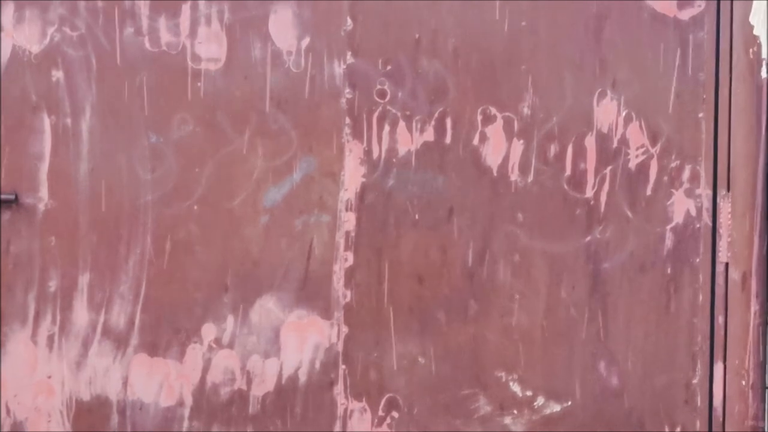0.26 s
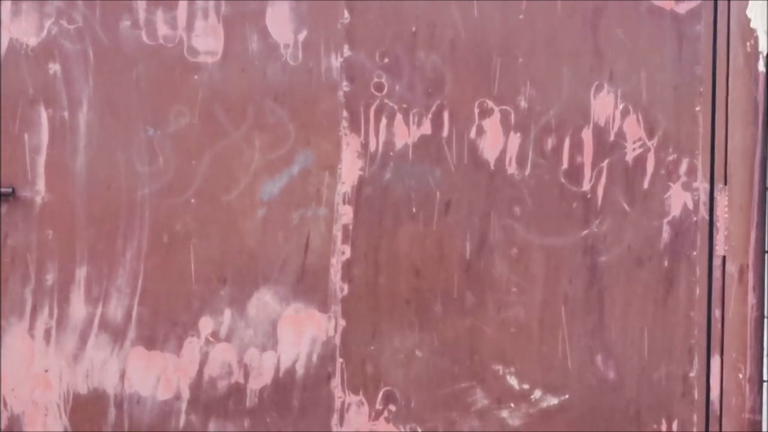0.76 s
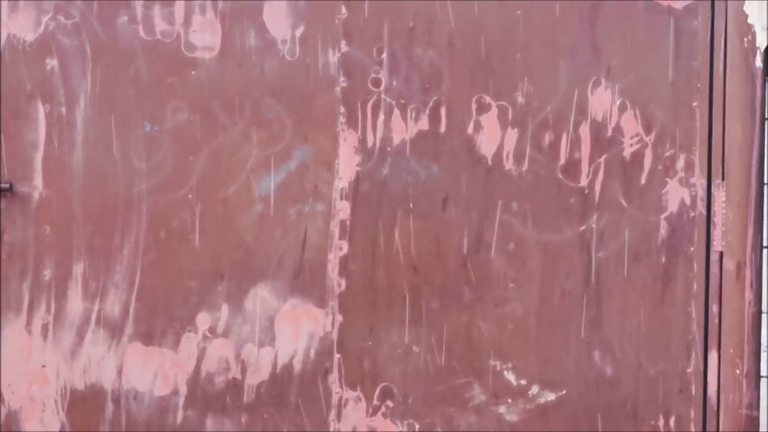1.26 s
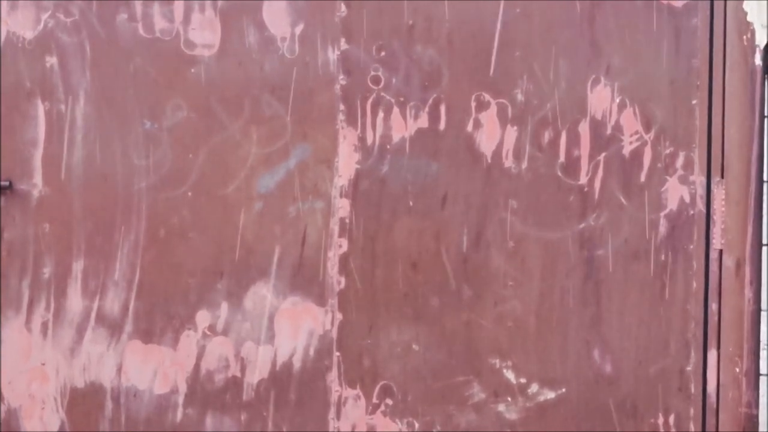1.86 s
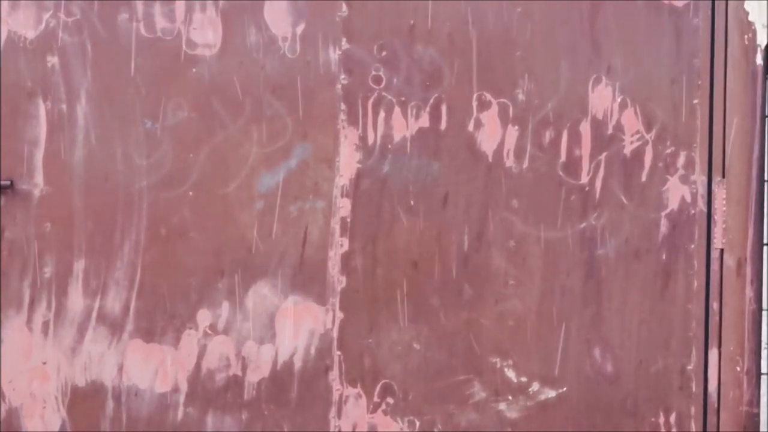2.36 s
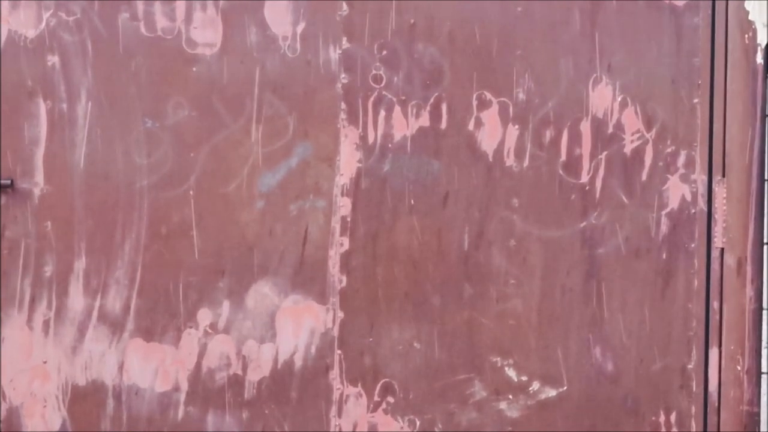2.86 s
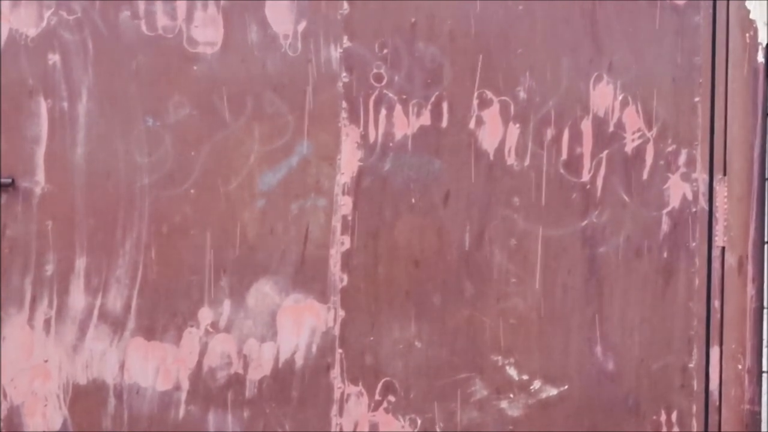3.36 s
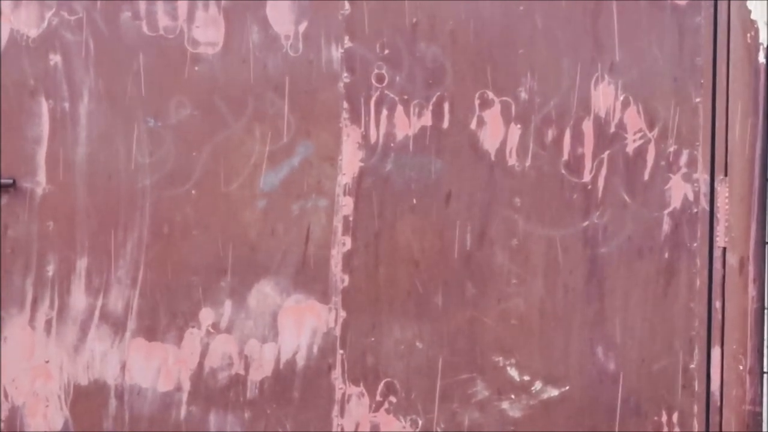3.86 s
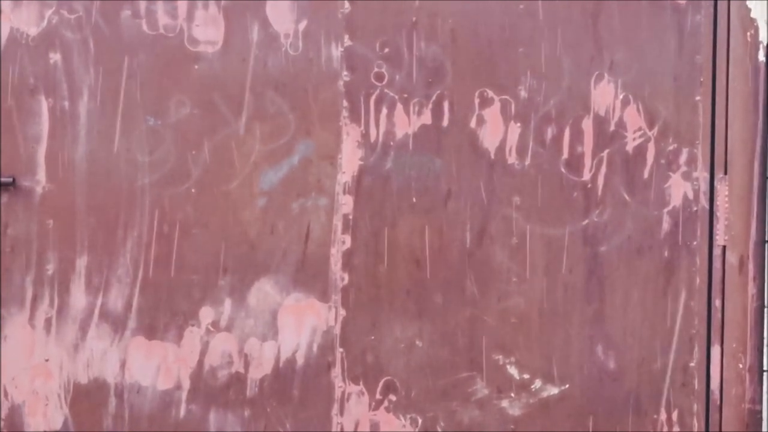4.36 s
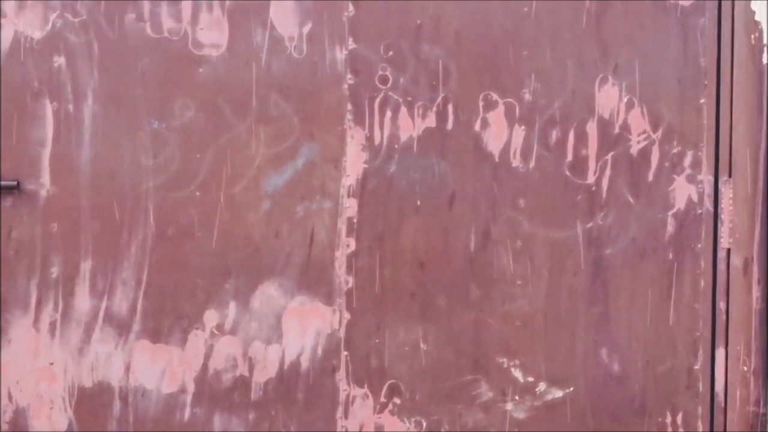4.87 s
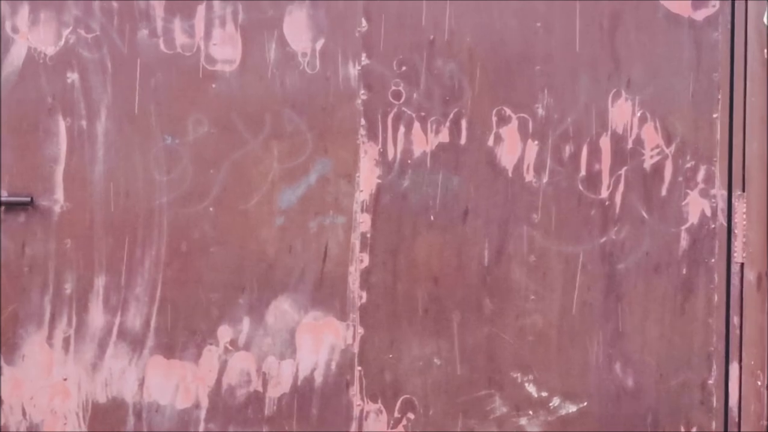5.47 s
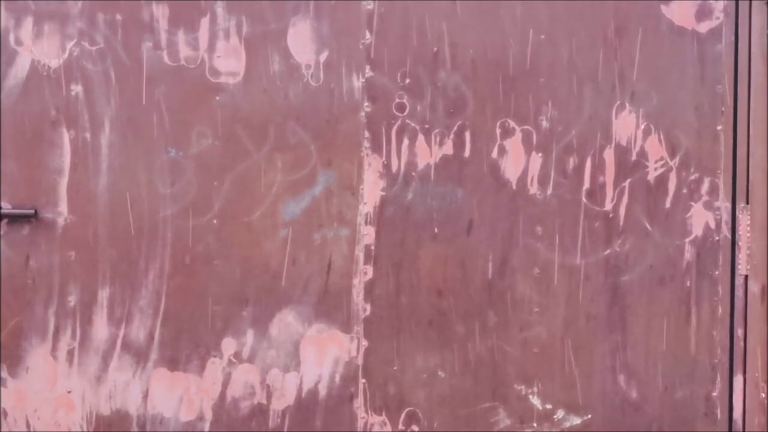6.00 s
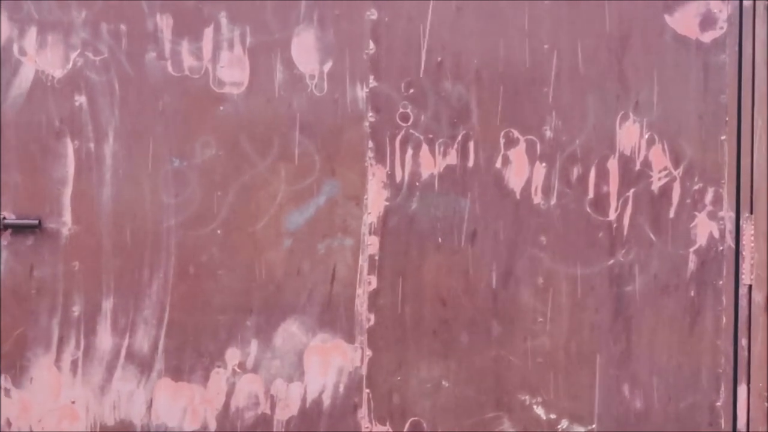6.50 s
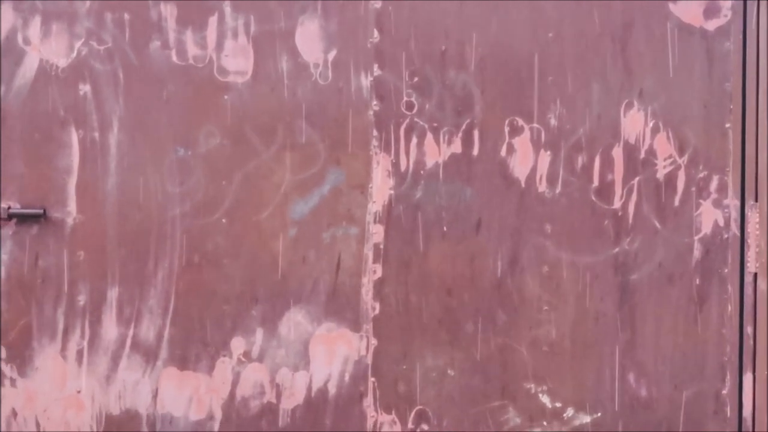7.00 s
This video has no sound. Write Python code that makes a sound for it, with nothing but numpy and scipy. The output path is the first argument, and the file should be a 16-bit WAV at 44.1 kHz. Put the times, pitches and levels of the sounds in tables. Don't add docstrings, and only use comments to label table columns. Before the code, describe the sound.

Steady rain patters and cracks on an outdoor metal sheet, with dull drips, low wind buffeting and distant rumble, then cuts off abruptly.

```python
import sys
import numpy as np
from scipy import signal
from scipy.fft import rfft, irfft, next_fast_len
from scipy.io import wavfile
from scipy.ndimage import uniform_filter1d, map_coordinates

SR = 44100
rng = np.random.default_rng(int(sys.argv[2]) if len(sys.argv) > 2 else 0)


def digitize_waveform(pressure):
    field = np.atleast_2d(pressure).T
    bounded = np.clip(field, -1, 1)
    quanta = np.round(bounded * 32767).astype(np.int16)
    wavfile.write(sys.argv[1], SR, quanta)


def voltage_ratio(decibels):
    exponent = np.asarray(decibels, float) / 20
    return 10 ** exponent


N = 319398

# f/Hz, level/dB per Hz
YARD_COLOUR = [(50, 1.5), (100, 1), (150, 6), (220, -11), (350, -1.5), (600, -62)]
# f/Hz, level/dB per Hz
WIND_COLOUR = [(15, -1.5), (35, 2.5), (70, -4.5), (120, -21), (250, -43.5), (500, -66.5)]
# t/s, half length/s, level/dB over calm
GUSTS = [(.1, 0.59, 17), (.7, 0.4, 13), (.88, 0.14, 7), (1.13, 0.26, 19.5), (1.58, 0.18, 14.5),
         (1.91, 0.25, 5), (2.55, 0.094, 11.5), (2.82, 0.095, 9), (3.35, 0.14, 6.5), (4.56, 0.33, -4),
         (5.4, 0.065, 6), (5.84, 0.13, 12.5), (6.2, 0.18, 9.5), (6.75, .3, 11.5), (7.1, .07, 3)]
# t/s, length/s, start f/Hz, end f/Hz, level/dB
WHISTLES = [
    (1.04, .056, 2740, 2760, -37),
    (1.09, .11, 2750, 2520, -49),
    (4.358, .005, 4400, 4150, -26),
    (4.005, .055, 2950, 3150, -37),
    (6.76, .045, 3120, 3020, -38),
    (6.81, .035, 2950, 2800, -39),
    (.33, .27, 141, 141, -44),
    (2.6, .045, 1460, 1370, -43),
]
# t/s, level/dB
RUNOFF = [(0, -46), (.42, -45.5), (.55, -46.5), (1.0, -43.5), (1.2, -48), (1.7, -39.5), (1.93, -46.5),
          (2.19, -60), (2.7, -57.5), (3.02, -38), (3.2, -48.5), (3.5, -39), (3.7, -47), (4.1, -39.5),
          (4.6, -40), (5.12, -35.5), (5.5, -42), (7.1, -47)]
# t/s, peak level/dB, f/Hz
HEAVY_DRIPS = [(.056, -32, 550), (.761, -32.5, 490), (1.641, -29.5, 816), (1.682, -17, 720),
               (2.797, -34, 730), (3.017, -25.5, 360), (3.416, -19, 482), (3.704, -21.5, 703),
               (3.87, -26.5, 414), (3.949, -29, 510), (4.011, -15, 790), (4.028, -22, 473),
               (4.075, -21, 782), (4.39, -28.5, 474), (5.077, -23.5, 534), (5.093, -29, 560),
               (5.138, -24, 499), (5.264, -20, 333), (5.44, -23, 488), (5.931, -30.5, 470),
               (5.951, -26, 474), (6.025, -27, 470), (6.126, -12.5, 1044), (6.139, -21, 1126),
               (6.151, -21, 950), (6.23, -27.5, 463), (6.273, -23.5, 465), (6.385, -24, 345),
               (7.101, -23.5, 457), (7.118, -26, 355)]
# t/s, peak level/dB, brightness/dB, ring f/Hz
BIG_DROPS = [(.0069, -16.5, -5.5, 3520), (.145, -16, 1.5, 6550), (0.268, -18.5, -15, 3040),
             (0.3183, -13, 6, 3390), (0.3723, -8.5, -12, 1945), (0.5801, -18, 1, 1280),
             (0.714, -17, -6, 3620), (0.7783, -13, -7, 2660), (0.8206, -15.5, 7, 2660),
             (1.2243, -17.5, -14, 2680), (1.6161, -14, -6.5, 2630), (1.677, -15.5, -15, 2720),
             (1.7867, -16.5, -3, 3460), (2.0838, -18, -11, 3540), (2.1617, -23.5, -15.5, 2590),
             (2.4981, -10, 2.5, 2260), (2.65, -11.5, -2, 7240), (2.6975, -13, -7, 2850),
             (2.8809, -11.5, -7, 2765), (3.0757, -15, -7, 3400), (3.5793, -15, -3, 6380),
             (3.6652, -0.5, 2, 6520), (3.7185, -8.5, -3.5, 2720), (3.9686, -16.5, 7, 6330),
             (4.2375, -14, -1, 1430), (4.8125, -12.5, 0, 4010), (5.6505, -15, 9, 4970),
             (6.2287, -10.5, 5, 4820), (6.7299, -7, -9, 2680), (6.7445, -5, -1, 4520)]
# t/s, peak level/dB
SMALL_DROPS = [(0.015, -17), (0.2002, -20), (0.428, -17.5), (.8453, -26.5), (0.9252, -28), (1.952, -29),
               (2.0026, -27), (2.2157, -20), (2.2661, -23), (2.3132, -25.5), (2.3336, -17.5),
               (2.3921, -17.5), (2.4192, -17), (2.594, -23), (2.8369, -15), (2.9542, -16), (3.6838, -11),
               (3.433, -17), (3.4526, -15), (3.7566, -17), (4.114, -17), (4.3604, -22.5), (4.4658, -18.5),
               (4.66, -18), (5.3685, -16), (5.5099, -20.5), (5.663, -10.5), (5.9053, -21), (6.1474, -12.5),
               (7.011, -18.5)]
# t/s, level/dB
RAINFALL = [(0, -38.5), (1.6, -37), (1.82, -43.5), (1.9, -52), (2.05, -53.5), (2.2, -48), (2.75, -43.5),
            (2.95, -36.5), (3.7, -38.5), (4.4, -38), (5.0, -37), (5.4, -34.5), (5.85, -39), (6.3, -35),
            (6.8, -40.5), (7.1, -40)]
# t/s, half length/s, change/dB
FLURRIES = [(.05, 0.1, 5), (.42, 0.14, -5), (.56, 0.097, -9.5), (.69, 0.025, 7.5), (.77, 0.035, -5),
            (.83, 0.031, 0.5), (.89, 0.052, -4.5), (.99, 0.017, -1), (1.15, 0.15, -11), (1.25, 0.033, 1),
            (1.66, 0.16, -2), (2.37, 0.077, 3.5), (2.58, 0.061, 3.5), (2.9, 0.04, 0.5), (3.18, 0.15, -4),
            (3.37, 0.043, 4), (3.5, 0.093, -2.5), (3.66, .08, -1), (3.88, 0.062, -3.5), (4.01, 0.12, 3.5),
            (4.18, 0.089, -3.5), (4.26, 0.024, 3), (4.37, 0.18, -4), (4.65, 0.084, 2), (4.78, 0.15, -4),
            (5.1, 0.062, -2), (5.2, .05, 1.5), (5.38, 0.12, 1.5), (6.14, 0.026, -3), (6.81, .08, -1.5)]
# t/s, heading (0-2)
HEADING = [
    (0, 0.48),
    (2.0, 0.31),
    (3.2, 1.13),
    (4.6, 1.17),
    (5.5, 2),
    (7.2, 1.92),
]
# f/Hz, level/dB per Hz
LEFT_COLOUR = [
    [(220, -6), (260, -14), (520, 11), (730, -10), (1030, 0), (1340, 3), (1640, -4), (1850, 6.5),
     (3400, -10), (4520, 12.5), (5170, -2.5), (5860, -5.5), (7540, -12), (8440, -16)],
    [(220, -9), (260, -8.5), (470, 1.5), (780, -2.5), (1030, -7.5), (1210, 0), (1640, -9), (1810, -4.5),
     (2890, -12.5), (3660, 3), (4440, 5.5), (5900, -14.5), (7280, -7.5), (8440, -15)],
    [(220, -8.5), (470, 0), (860, -13), (1030, 4), (1380, -12.5), (2150, -9.5), (3320, -12.5), (3570, 2.5),
     (3960, -5.5), (4650, -5), (5640, -12), (6500, -12.5), (7110, -12), (8440, -20.5)],
]
# f/Hz, level/dB per Hz
RIGHT_COLOUR = [
    [(220, -15.5), (340, 2), (520, 7), (730, -3), (1290, 3), (1550, -5.5), (2200, 5), (2450, 0.5),
     (2670, 8.5), (3490, 8.5), (3920, -0.5), (5560, 2), (8270, -14), (8440, -10)],
    [(220, -7), (470, 1.5), (1080, -3.5), (1420, -3), (1590, -12), (2150, 3), (2330, 0.5), (2930, 5),
     (4260, -1), (5080, -4.5), (5250, 0.5), (6720, 0), (6850, -0.5), (8440, -2.5)],
    [(220, -5.5), (470, 5.5), (780, -2.5), (900, -6.5), (1030, 5), (1420, 0.5), (1590, -4), (1980, 0.5),
     (3400, -1), (4740, 1.5), (5250, 6), (6720, -2), (7000, -6.5), (8440, -9)],
]
RIGHT_LAG = [0.00042, 0.0002967, 0.00019]
# f/Hz, extra lead of the left port/rad
BEND = [(300, 0.11), (750, 0.64), (1200, 2.04), (4000, 1.6)]
# f/Hz, share (0-1)
ALIKE = [(100, 0.92), (400, 0.94), (1000, 0.53), (2500, 0.48), (8000, 0.07)]

TOP_HZ, END_S = 8570, 7.1295
CALM_DB = -58.5
SMALL_BRIGHT_DB, SMALL_HZ = 0.5, 3080
STRAYS, STRAY_DB, STRAY_SPREAD_DB = 70, 18.5, 4.5
WALL_ECHO_S, ECHO_DB = .0184, -7
ECHO_HEADING, ECHO_NARROW_DB = 0.95, 20
SPRAY_DB, SPRAY_SWING = -5, 1.35
PATCH_LAST = .6


def unit(x):
    return x / np.sqrt(np.mean(x ** 2) + 1e-20)


def along(points, hz):
    f, value = np.transpose(points)
    return np.interp(np.log(hz + 1), np.log(f + 1), value)


def curves(rows):
    s, *columns = np.transpose(rows)
    return [np.interp(np.arange(N) / SR, s, column) for column in columns]


def swells(rows):
    t = np.arange(0, N / SR, .002)
    total = np.zeros(len(t))
    for s, half, db in rows:
        total += db * np.cos(np.pi / 2 * np.clip((t - s) / half, -1, 1)) ** 2
    return np.interp(np.arange(N) / SR, t, total)


def wobble(rate):
    knots = rng.standard_normal(int(N * rate / SR) + 4)
    return map_coordinates(knots, [np.arange(N) * rate / SR])


def filtered(x, response):
    m = next_fast_len(N + 8192)
    return irfft(rfft(x, m) * response(np.fft.rfftfreq(m, 1 / SR)), m)[..., :N]


def band(x, lo_hz, hi_hz):
    return signal.sosfilt(signal.butter(2, [lo_hz, hi_hz], "bandpass", fs=SR, output="sos"), x)


def yard():
    rumble = filtered(rng.standard_normal(N), lambda hz: voltage_ratio(along(YARD_COLOUR, hz)))
    return voltage_ratio(-56.5 + 5.3 * wobble(6.5)) * unit(rumble)


def wind():
    level_db = CALM_DB + swells(GUSTS)
    lumps = voltage_ratio(0.75 * np.array([wobble(7.3), wobble(12.0)]))
    pressure = filtered(rng.standard_normal((2, N)), lambda hz: voltage_ratio(along(WIND_COLOUR, hz)))
    return unit(lumps * pressure) * voltage_ratio([level_db + 7.5, 0.42 * level_db - 45.5])


def whistles():
    out = np.zeros(N)
    flutter = 1 + .018 * wobble(180)
    for s, length, start_hz, end_hz, db in WHISTLES:
        start = round(s * SR)
        u = np.arange(round(length * SR)) / (length * SR)
        hz = (start_hz + (end_hz - start_hz) * u) * flutter[start:][:len(u)]
        tone = np.sin(2 * np.pi * np.cumsum(hz) / SR)
        out[start:][:len(u)] += voltage_ratio(db) * np.sin(np.pi * u) ** 0.21 * tone
    return out * voltage_ratio(3.1 * wobble(140))


def impacts(rate, spread_db, t60):
    hit = rng.random(N) < rate / SR
    size = voltage_ratio(spread_db * np.minimum(rng.exponential(1, N), 2.8)) ** 2
    return signal.lfilter([1], [1, -voltage_ratio(-120 / (t60 * SR))], hit * size)


def patter(power, far, lo_hz, hi_hz):
    heading, = curves(HEADING)
    blur = far * voltage_ratio(3.3 * heading)
    envelope = np.sqrt(power / power.mean() + blur)
    return unit(band(envelope * rng.standard_normal((2, N)), lo_hz, hi_hz))


def drumming():
    drum_db, = curves(RUNOFF)
    drum = patter(impacts(rate=150, spread_db=2.0, t60=0.11), far=0.71, lo_hz=110, hi_hz=950)
    return voltage_ratio(drum_db - 0.5 + 0.66 * wobble(45)) * drum


def thuds():
    out = np.zeros((2, N + SR))
    t = np.arange(SR // 8) / SR
    for s, db, hz in HEAVY_DRIPS:
        ring = np.sin(2 * np.pi * hz * t) * voltage_ratio(-60 * t / .028) * (1 - np.exp(-t / .001))
        puff = band(rng.standard_normal((2, len(t))) * voltage_ratio(-60 * t / .045), .45 * hz, 1.7 * hz)
        out[:, round(s * SR):][:, :len(t)] += voltage_ratio(db - 1.5) * (ring + 2.25 * puff)
    return out[:, :N]


def strays():
    when, size, bright, pitch = rng.random((STRAYS, 4)).T
    s = .01 + END_S * when ** 1.4
    flurry_db = swells(FLURRIES)[np.minimum(s * SR, N - 1).astype(int)]
    rain_db = np.interp(s, *np.transpose(RAINFALL))
    db = rain_db + flurry_db + STRAY_DB + STRAY_SPREAD_DB * (size - .5)
    bright_db = SMALL_BRIGHT_DB + 14 * (bright - .6)
    return list(zip(s, db, bright_db, SMALL_HZ * voltage_ratio(7 * (pitch - .5))))


def drops():
    out = np.zeros((2, N + SR))
    t = np.arange(SR // 16) / SR
    touch = .0008
    rise = np.clip(t / touch, 0, 1) ** 2
    splash = rise * (voltage_ratio(-60 * (t - touch) / .012) + .35 * voltage_ratio(-60 * t / .04))
    snap = np.zeros(len(t))
    snap[round(touch * SR)] = 6
    small = [(s, db, SMALL_BRIGHT_DB, SMALL_HZ) for s, db in SMALL_DROPS]
    for s, db, bright_db, hz in BIG_DROPS + small + strays():
        low, high = splash * rng.standard_normal((2, 2, len(t))) - snap
        ring = .24 * rise * voltage_ratio(-60 * t / .022) * np.sin(2 * np.pi * hz * t)
        crack = band(low, .62 * min(hz, 3200), 4000)
        crack = crack + voltage_ratio(bright_db + 4.5) * band(high, 4000, 10750)
        crack = crack / abs(crack[0]).max() + ring
        out[:, round((s - .0006) * SR):][:, :len(t)] += voltage_ratio(db - 1.5) * crack
    heading, = curves(HEADING)
    echo_db = ECHO_DB - ECHO_NARROW_DB * (heading - ECHO_HEADING) ** 2
    echo = voltage_ratio(echo_db) * np.roll(out, round(WALL_ECHO_S * SR), axis=1)[:, :N]
    return voltage_ratio(0.8) * (out[:, :N] + echo)


def pings(count, hz, cycles, spread_db):
    at, pitch, life, size = rng.random((count, 4)).T[:, :, None]
    f = hz * voltage_ratio(13 * (pitch - .5))
    t = np.arange(400) / SR
    level_db = -spread_db * np.log(size + 0.057)
    decay_db = 9 * t * f / (cycles * (0.31 + life))
    rings = voltage_ratio(level_db - decay_db) * np.sin(2 * np.pi * f * t)
    places = (at * N + t * SR).astype(int)
    return unit(np.bincount(places.ravel(), rings.ravel(), N + SR)[:N])


def fine_rain():
    rain_db, = curves(RAINFALL)
    flurry_db = swells(FLURRIES)
    body_db = rain_db + flurry_db
    spray_db = rain_db + SPRAY_DB + SPRAY_SWING * flurry_db
    near = impacts(rate=200, spread_db=6.5, t60=.018)
    near = near + 0.027 * np.roll(near, round(WALL_ECHO_S * SR))
    clumps_db = 1.6 * wobble(35)
    body_hits = near + 2.5 * impacts(rate=380, spread_db=3, t60=0.034)
    spray_hits = near + 0.54 * impacts(rate=630, spread_db=7.0, t60=0.017)
    body = patter(body_hits, far=0.68, lo_hz=900, hi_hz=3370)
    spray = patter(spray_hits, far=0.37, lo_hz=4040, hi_hz=9150)
    ringing = voltage_ratio(body_db - 8.5) * pings(count=2500, hz=2443, cycles=12.0, spread_db=6.0)
    tinkle = voltage_ratio(spray_db - 7.0) * pings(count=2500, hz=5077, cycles=51.0, spread_db=5.5)
    noise = voltage_ratio(body_db - 1.5 + clumps_db) * body + voltage_ratio(spray_db + 4.5 + clumps_db) * spray
    return noise + ringing + tinkle


def patchy(x, depth_db):
    z = signal.stft(x, nperseg=512)[2]
    field = uniform_filter1d(rng.standard_normal(z.shape[1:]), size=5, axis=0)
    field = uniform_filter1d(field, size=12, axis=1)
    steadying = np.linspace(1, PATCH_LAST, field.shape[1])
    return signal.istft(z * voltage_ratio(depth_db * steadying * unit(field)), nperseg=512)[1][:, :N]


def ports(pair):
    def mixture(hz):
        share = np.clip(along(ALIKE, hz), 0, 1)
        return np.array([share, np.sqrt(1 - share ** 2)])

    left = filtered(pair, mixture).sum(axis=0)
    heading, = curves(HEADING)
    out = np.zeros((2, N))
    for k, lag in enumerate(RIGHT_LAG):
        def left_response(hz):
            lead = np.exp(1j * (2 * np.pi * hz * lag + along(BEND, hz)))
            return voltage_ratio(along(LEFT_COLOUR[k], hz)) * lead

        weight = np.clip(1 - abs(np.clip(heading, 0, 2) - k), 0, 1) ** 0.69
        out[0] += weight * filtered(left, left_response)
        out[1] += weight * filtered(pair[0], lambda hz: voltage_ratio(along(RIGHT_COLOUR[k], hz)))
    return out


def scene():
    sheet = patchy(fine_rain() + drumming(), depth_db=2.11) + drops() + thuds() + whistles()
    return yard() + wind() + ports(sheet)


def band_limit(x):
    return signal.sosfilt(signal.butter(12, 9730, fs=SR, output="sos"), x)


def record(dry):
    mix = filtered(dry, lambda hz: voltage_ratio(-60 * np.clip((hz - TOP_HZ) / 120, 0, 2)))
    mix = mix * (np.arange(N) < END_S * SR)
    return band_limit(mix)


dry = scene()
out = record(dry)
digitize_waveform(out)
```